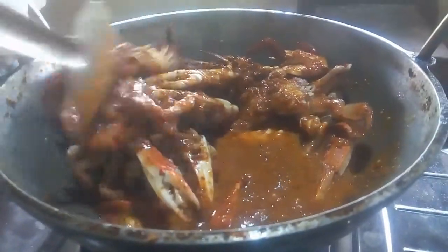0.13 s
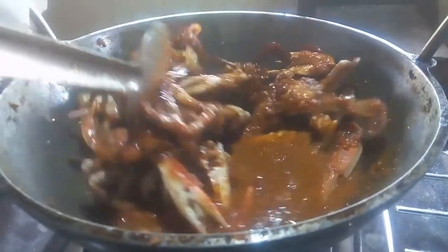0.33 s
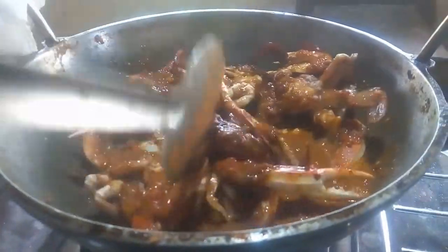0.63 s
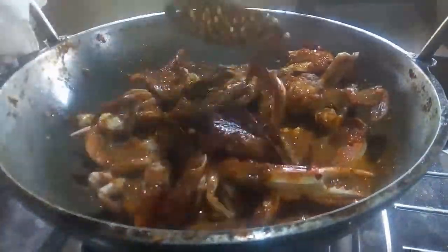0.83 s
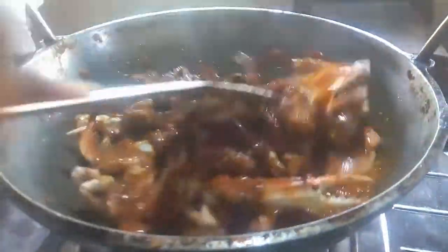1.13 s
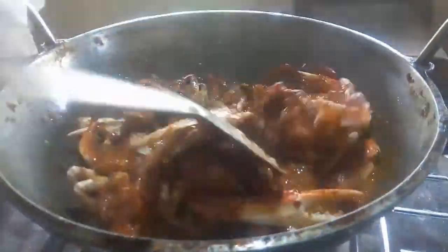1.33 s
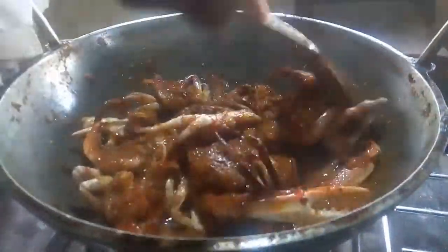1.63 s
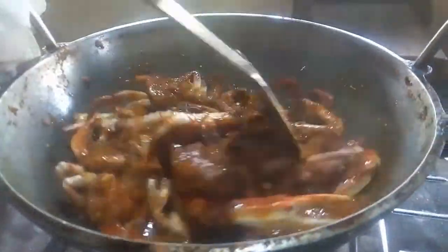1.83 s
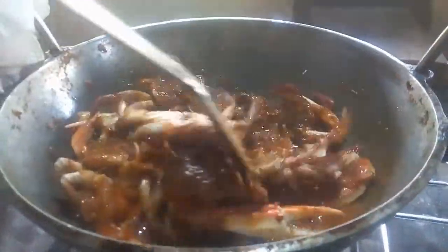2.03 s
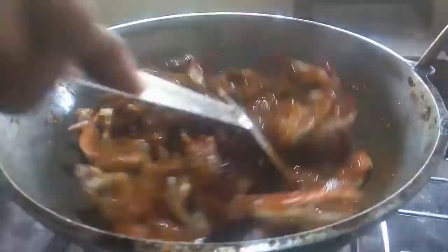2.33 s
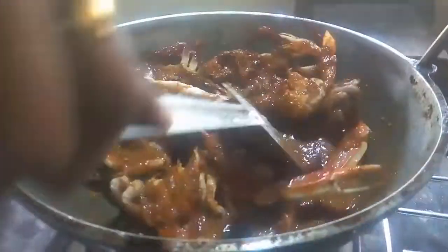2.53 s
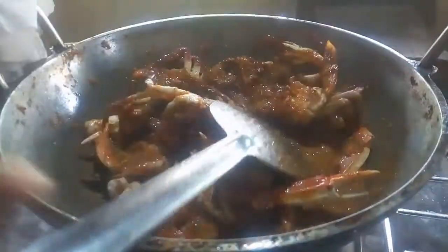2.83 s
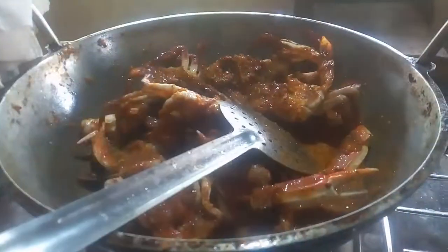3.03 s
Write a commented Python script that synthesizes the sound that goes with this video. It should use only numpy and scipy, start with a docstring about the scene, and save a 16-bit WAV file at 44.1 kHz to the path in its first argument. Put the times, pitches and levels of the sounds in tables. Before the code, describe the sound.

A steel skimmer stirs crab in a steel pan, hissing and grating in uneven strokes. A sharp tap comes at 0.26 s, a stronger scrape near 0.55, a knock with a faint ring at 1.0. Clinks and soft thuds cluster from 1.6 to 2.1 over wet gravy slop; a harsh scrape and low thuds hit at 2.3. After a lull, the skimmer drops at 2.92, loudly clattering in rapid bounces until about 3.03, ringing briefly. Close, small kitchen, faint background noise.

```python
"""Metal hisses and grates over shells, small hard taps ring out, and thick gravy slops below.
A steel skimmer stirs crab in a steel pan, close to a phone in a small kitchen; at the end it drops and bounces.
The rubbing and slop are filtered noise, and the taps, thuds and bounces are short fading tones and noise.
Echoes and a quiet kitchen noise surround them, in stereo."""
import sys
import numpy as np
from scipy import signal
from scipy.fft import rfft, irfft
from scipy.io import wavfile
from scipy.ndimage import uniform_filter1d

SR = 44100
rng = np.random.default_rng(int(sys.argv[2]) if len(sys.argv) > 2 else 0)


def attenuation_scalar(level_db):
    """Turn a level in dB into a linear amplitude multiplier (20 dB per decade)."""
    decades = np.asarray(level_db, float) / 20
    return 10 ** decades


def master(y):
    """Save y as 16-bit WAV."""
    cut = np.clip(np.atleast_2d(y).T, -1, 1)
    pcm = np.round(cut * 32767)  # scale
    wavfile.write(sys.argv[1], SR, pcm.astype(np.int16))


N = 141120  # length [samples]

# Tone of steel dragged over steel and shells: (frequency [Hz], gain [dB])
DRAG_TONE = [(400, -13), (800, -13.5), (1200, -3), (1800, -3.5), (3400, -1), (4600, -6), (6300, -6),
             (7400, -12.5), (8500, -17.5), (16000, -56)]
# Tones of the skimmer and pan ringing together: (frequency [Hz], strength [dB], time to fade by 60 dB [s])
STEEL_MODES = [(495, 12, .25), (1308, -8, .22), (1852, -11, .24), (2295, -14, .22), (2530, -9, .24),
               (3171, -8, .16), (3288, -3, .18), (3667, -12, .2), (4097, -8, .2), (4121, -4, .18),
               (4440, -8, .18), (5120, -6, .2), (5227, -5, .18), (5577, -1, .17), (6223, -7, .15),
               (6370, -2, .26), (6438, -2, .15), (6702, -6, .12), (6885, -1, .09), (7149, -6, .09),
               (8452, -22, .2), (9012, -19, .16), (10380, -15, .14), (11350, -16, .22), (12880, -18, .25),
               (15170, -16, .2)]


def unit(x):
    """Scales a sound to an rms level of 1."""
    return x / np.sqrt(np.mean(x ** 2))


def colour(x, points):
    """Shapes the tone through (frequency [Hz], gain [dB]) points, without sounding ahead of time."""
    hz, db = np.array(points, float).T
    grid_hz = np.arange(1025) * SR / 2048 + 1
    log_gain = np.interp(np.log(grid_hz), np.log(hz), db) * np.log(10) / 20
    # folding the cepstrum makes the filter respond as early as it can (minimum phase)
    cepstrum = irfft(log_gain)
    cepstrum[1:1024] *= 2
    cepstrum[1025:] = 0
    response = irfft(np.exp(rfft(cepstrum)))
    return signal.fftconvolve(x, response)[:len(x)]


def band(x, hz, width):
    """Lets one resonance through, with gain 1 at its centre."""
    return signal.lfilter(*signal.iirpeak(hz, hz / width, fs=SR), x)


def high(x):
    """Keeps what lies above 500 Hz, where the two ports hear different sound."""
    return signal.lfilter(*signal.butter(2, 500, "high", fs=SR), x)


def walk(rate):
    """Slides between random levels, `rate` of them each second."""
    hold = int(SR / rate)
    levels = rng.standard_normal(N // hold + 1)
    return uniform_filter1d(np.repeat(levels, hold), hold)[:N]


def add(out, start_s, x):
    """Mixes a short sound in at start_s."""
    i = int(start_s * SR)
    out[i:i + len(x)] += x[:N - i]


def fade(t, t60):
    """Dies away steadily, by 60 dB in t60 seconds."""
    return attenuation_scalar(-60 * t / t60)


def region(modes, hz, octaves):
    """Gives a level in dB for each mode: those near hz are struck hardest."""
    distance = np.log2(np.array(modes)[:, :1] / hz) / octaves
    return -6 * distance ** 2


def ring(modes, t, extra_db):
    """Starts all modes of an object at once, with random phases and slightly random levels."""
    hz, db, t60 = np.array(modes, float).T[:, :, None]
    scatter, phase = rng.standard_normal((2,) + hz.shape)
    level = attenuation_scalar(db + extra_db + 2.5 * scatter)
    return (level * fade(t, t60) * np.sin(2 * np.pi * hz * t + phase)).sum(axis=0)


def stirring(t):
    """Rubbing makes hiss and grit, partly through the steel's resonances; gravy heaves as low, uneven noise."""
    # Strokes of the skimmer: (time [s], drag level [dB], slop level [dB])
    strokes = [(0, -53, -55), (.04, -54.5, -65), (.1, -51.5, -68.5), (.16, -55, -69), (.24, -51.5, -64),
               (.3, -49.5, -60), (0.399, -63, -65.5), (.45, -53, -59), (0.551, -44.5, -56.5),
               (.63, -56, -61.5), (0.701, -68.5, -65), (.78, -54, -63.5), (.84, -98, -69), (.98, -66, -69),
               (1.06, -60.5, -63.5), (1.116, -49.5, -60), (1.2, -57, -55.5), (1.329, -50.5, -60),
               (1.46, -70, -69.5), (1.6, -98, -73.5), (1.84, -50.5, -50.5), (1.97, -59, -61.5),
               (2.03, -54, -56.5), (2.101, -62, -63), (2.2, -67.5, -78), (2.3, -42.5, -81),
               (2.35, -52, -53.5), (2.52, -55.5, -59), (2.66, -65.5, -67.5), (2.88, -103, -68)]
    # Tone of the moving gravy: (frequency [Hz], gain [dB])
    slop_tone = [(40, -31), (149, -0.5), (300, -3), (418, 1), (590, -4), (1500, -10.5), (1950, -40.5),
                 (3300, -120)]
    s, drag_db, slop_db = np.array(strokes).T
    grit_per_s, grit_spread_db, grit_db = 300, 3, 0.5

    grains = rng.random(N) < grit_per_s / SR
    grain_size = attenuation_scalar(grit_spread_db * rng.exponential(size=N).clip(0, 4))
    grit = grains * grain_size * rng.choice([-1, 1], N)
    hiss = rng.standard_normal(N) * attenuation_scalar(4 * walk(60))
    rub = hiss + attenuation_scalar(grit_db) * unit(grit)

    # each mode but the first three answers the rubbing, at its own wavering level
    steel = sum(attenuation_scalar(db) * band(rub, hz, 90) * attenuation_scalar(6 * walk(25)) for hz, db, _ in STEEL_MODES[3:])
    drag = unit(unit(colour(rub, DRAG_TONE)) + attenuation_scalar(-7) * unit(steel))
    heaving = rng.standard_normal(N) * attenuation_scalar(2.87 * walk(44.76))
    slop = unit(colour(heaving, slop_tone))
    out = drag * attenuation_scalar(np.interp(t, s, drag_db)) + slop * attenuation_scalar(np.interp(t, s, slop_db))
    return out + squeaks(t)


def squeaks(t):
    """Wet steel sings briefly while rubbed: noise through a resonance, swelling and fading."""
    # Squeaks: (start [s], length [s], frequency [Hz], width [Hz], level [dB])
    songs = [(0.034, 0.12, 3370, 119, -47.5), (0.57, 0.11, 1290, 39.7, -67), (0.642, 0.07, 710, 297, -53.5),
             (0.734, 0.072, 5620, 250, -56), (1.146, 0.092, 439, 61.4, -57),
             (1.215, 0.048, 2650, 915, -44.5), (1.565, 0.083, 4030, 500, -60),
             (2.21, 0.095, 1245, 121, -61)]
    out = np.zeros(N)
    for s, length, hz, width, db in songs:
        rise, fall = (t - s) / 0.027, (s + length - t) / 0.039
        shape = np.clip(np.minimum(rise, fall), 0, 1)
        song = band(band(rng.standard_normal(N), hz, width), hz, width)
        out += attenuation_scalar(db) * shape * unit(song)
    return out


def taps():
    """Shells tap steel: a click of a few cycles, a rattle after it, and some rings of blade and pan."""
    # Shell taps: (time [s], level [dB], click frequency [Hz], rattle against the click [dB])
    shell_taps = [(0.1166, -28.5, 6000, -19), (0.2509, -35, 2440, -6.5), (0.26, -19.5, 5480, -54),
                  (0.5376, -31, 4030, -19), (0.5543, -40, 4270, -4.5), (0.7252, -38.5, 3020, -33),
                  (1.0002, -32.5, 6270, -5), (1.273, -42, 3160, -22), (1.3001, -35, 2560, -8),
                  (1.344, -35, 5370, -20), (1.373, -35, 2970, -24), (1.512, -42, 3270, -33),
                  (1.5224, -46, 3340, -38), (1.6305, -29, 2630, -16), (1.705, -34, 1920, -2.5),
                  (1.7958, -33, 890, -24), (1.849, -32.5, 4500, -31), (1.9003, -26.5, 3520, -11),
                  (2.0086, -37.5, 4160, -31), (2.0267, -39.5, 3600, -7.5), (2.047, -35, 2820, -34),
                  (2.0684, -30, 3620, -7.5), (2.2513, -37.5, 3080, -12), (2.2744, -34, 2530, -31),
                  (2.2982, -32.5, 5350, -34), (2.392, -38, 3040, -19), (2.609, -39.5, 4070, -20),
                  (2.7478, -40.5, 3420, -29)]
    # Taps that leave steel ringing: (time [s], blade level [dB], pan level [dB], loudest region [Hz])
    steel_rings = [(0.2597, -48, -61, 3300), (.9991, -43, -71, 7000), (1.628, -37, -73, 4130),
                   (1.706, -66, -40.5, 1780), (2.0682, -45, -75, 7000)]
    # Tones of the skimmer's blade: (frequency [Hz], strength [dB], time to fade by 60 dB [s])
    blade_modes = [(3390, 2, .24), (4900, 0, .24), (6300, -8, .2)]
    # Tones of the pan: (frequency [Hz], strength [dB], time to fade by 60 dB [s])
    pan_modes = [(495, -1, .16), (1809, 0, .2), (2299, -5, .14), (2530, -9, .18), (5276, -8, .1)]
    out, t = np.zeros(N), np.arange(9000) / SR
    for s, db, hz, rattle_db in shell_taps:
        noise = rng.standard_normal((2, len(t)))
        snap = band(colour(noise[0] * fade(t, 0.0018), DRAG_TONE), hz, 2.17 * hz)
        tone = np.sin(2 * np.pi * hz * t) * np.clip(t / 0.00041, 0, 1) * fade(t, 0.0077 + 12 / hz)
        click = tone + 1.61 * snap / np.abs(snap).max()
        rattle = attenuation_scalar(rattle_db) * unit(colour(noise[1], DRAG_TONE)) * fade(t, 0.065)
        add(out, s, attenuation_scalar(db) * (click + rattle))
    for s, blade_db, pan_db, hz in steel_rings:
        blade = ring(blade_modes, t, blade_db + region(blade_modes, hz, 0.3))
        pan = ring(pan_modes, t, pan_db + region(pan_modes, hz, 2.1))
        add(out, s, blade + pan)
    return out


def thuds():
    """Thuds and one higher knock in the pan: a short pulse that sags in pitch, with a wet rumble."""
    # Thuds and the knock: (time [s], level [dB], starting frequency [Hz])
    pulses = [(0.501, -46, 420), (0.9995, -34, 1270), (1.514, -46, 544), (1.665, -51, 690),
              (1.705, -39.5, 570), (1.794, -37.5, 464), (1.9, -36, 450), (2.326, -32, 422),
              (2.335, -37, 503), (2.344, -37, 184), (2.395, -40.5, 250)]
    out, t = np.zeros(N), np.arange(7000) / SR
    for s, db, hz in pulses:
        pulse = np.sin(2 * np.pi * hz * t * (1 - 8 * t)) * fade(t, 9 / hz)
        rumble = band(band(rng.standard_normal(len(t)), hz, hz * 2.5), hz, hz * 2.5)
        wet = attenuation_scalar(-6) * unit(rumble) * fade(t, 0.057)
        add(out, s, attenuation_scalar(db) * (pulse + wet))
    return out


def drop():
    """Each bounce cracks, rattles and rings skimmer and pan; touching the pan again damps the ring."""
    # Bounces: (time [s], ring level [dB], crack level [dB], loudest region [Hz],
    #           free ringing until damped [s], left over right [dB])
    hits = [(2.9243, -14, -15.5, 6430, 0.011, 5), (2.9326, -14.5, -29, 3350, 0.0206, 3),
            (2.9603, -17, -11.5, 5070, 0.031, 1.5), (2.9935, -22, -12.5, 6100, 0.022, -5),
            (3.0056, -19.5, -18, 3730, 0.016, 2), (3.024, -25.5, -24, 2830, .2, -3.5)]
    # Tone of the crack: (frequency [Hz], gain [dB])
    crack_tone = [(60, -21), (200, -10), (1110, -4.5), (2140, -4), (3500, 0), (4400, -2), (6740, -6.5),
                  (7750, -1.5), (11800, -12.5), (16000, -36)]
    out, t = np.zeros((2, N)), np.arange(13000) / SR
    for s, ring_db, crack_db, hz, free, left_db in hits:
        region_db = region(STEEL_MODES, hz, 1.2)
        damp = attenuation_scalar(-15 * np.clip((t - free) / 0.0045, 0, 1))
        noise = rng.standard_normal((2, len(t)))
        uneven = noise[1] * attenuation_scalar(6 * walk(200)[:len(t)])
        clatter = colour(colour(uneven, crack_tone), [(7000, -2), (8000, -21)])
        crack = unit(colour(noise[0], crack_tone)) * np.clip(t / 0.0019, 0, 1) * fade(t, 0.016)
        crack = crack + attenuation_scalar(-12.5) * unit(clatter) * fade(t, 0.18)
        for port, side in zip(out, (1, -1)):
            # each port hears the modes in its own mix
            ringing = attenuation_scalar(ring_db) * damp * ring(STEEL_MODES, t, region_db)
            add(port, s, attenuation_scalar(side * left_db / 2) * (attenuation_scalar(crack_db) * crack + ringing))
    return out


def at_port(stirred, tapped, side):
    """The left port (side 1) is nearer: its treble is louder and its sound earlier; bass is shared."""
    right_late, taps_later = 8, 8  # delays at the right port [samples]
    near = stirred + np.roll(tapped, taps_later * (side < 0))
    louder_treble = near + (attenuation_scalar(side * 3 / 2) - 1) * high(near)
    return np.roll(louder_treble, right_late * (side < 0))


def walls(echo, side, tail):
    """Echoes as fading noise: a very short early burst and a duller room tail; the ports share the bass."""
    both = echo[0] + side * high(echo[1])
    early = both[0] * fade(tail, 0.009)
    room = both[1] * fade(tail, 0.19)
    room = signal.lfilter(*signal.butter(1, 7000, fs=SR), room)
    return attenuation_scalar(-4) * early / np.linalg.norm(early) + attenuation_scalar(-6.5) * room / np.linalg.norm(room)


def kitchen(hum, side):
    """Quiet background noise at -61 dB; the ports differ mostly in the treble."""
    # Tone of the kitchen: (frequency [Hz], gain [dB])
    kitchen_tone = [(25, -39), (64, 6), (150, -13), (263, -9.5), (600, -22), (911, -15.5), (2000, -3),
                    (6300, -7.5), (7600, -24), (16000, -71)]
    apart = 0.29 * hum[1] + high(hum[1])
    return attenuation_scalar(-61) * unit(colour(hum[0] + 0.69 * side * apart, kitchen_tone))


def scene():
    """Places stirring, taps, thuds and drop at two ports, with echoes and kitchen noise."""
    t, tail = np.arange(N) / SR, np.arange(16000) / SR
    stirred, tapped = stirring(t) + thuds(), taps()
    # the pan is wide, so part of its sound differs at the ports
    spread = attenuation_scalar(-19) * high(stirring(t))
    hum = rng.standard_normal((2, N)) * attenuation_scalar(2.5 * walk(14))
    # first index: shared or different at the ports; second: early or room
    echo = rng.standard_normal((2, 2, len(tail))) * np.clip(tail / 0.00071, 0, 1)
    out = []
    for side, dropped in zip((1, -1), drop()):
        direct = at_port(stirred, tapped, side) + dropped
        echoes = signal.fftconvolve(direct, walls(echo, side, tail))[:N]
        out.append(direct + echoes + side * spread + kitchen(hum, side))
    return np.array(out)


def low_pass(x):
    """Removes everything above the highest recorded frequency."""
    return signal.sosfilt(signal.butter(12, 16310, fs=SR, output="sos"), x)


def record(dry):
    """The phone cuts the bass below 69 Hz and rounds the peaks."""
    thin = signal.lfilter(*signal.butter(2, 69, "high", fs=SR), dry)
    rounded = 0.9 * np.tanh(thin / 0.89)
    return low_pass(rounded)


dry = scene()
out = record(dry)
master(out)
```